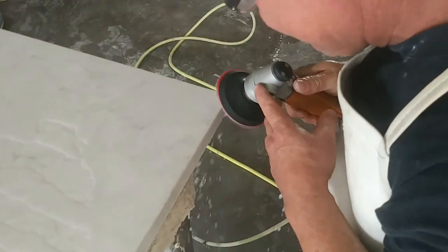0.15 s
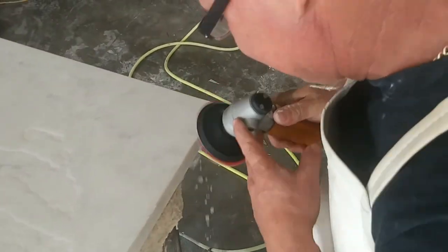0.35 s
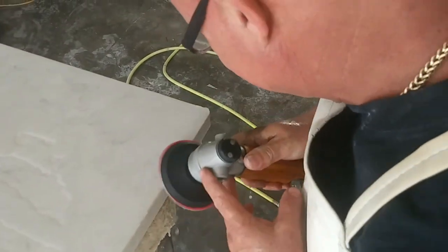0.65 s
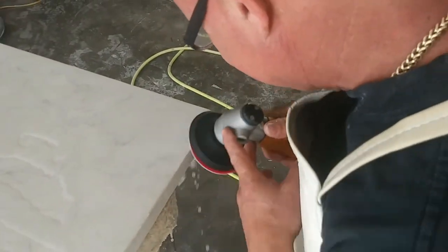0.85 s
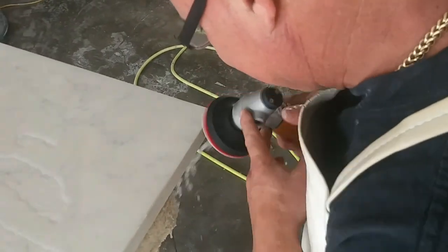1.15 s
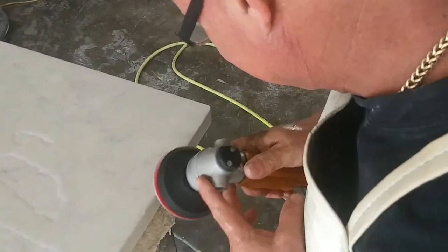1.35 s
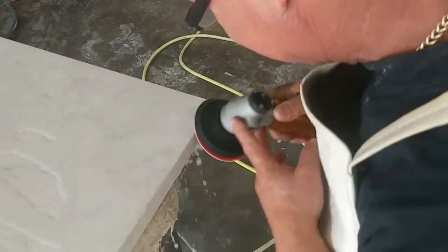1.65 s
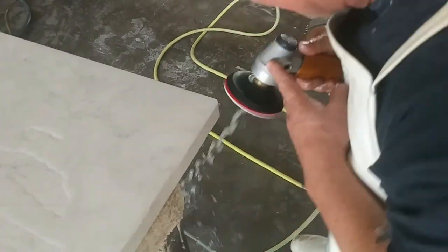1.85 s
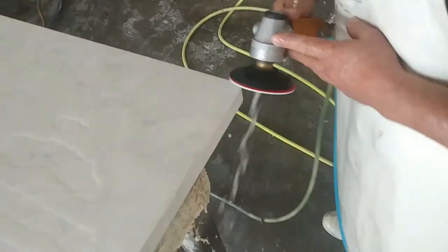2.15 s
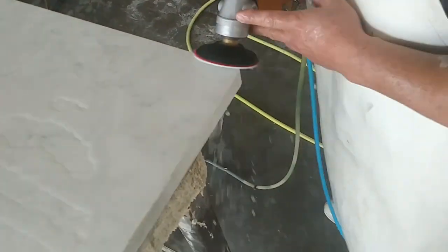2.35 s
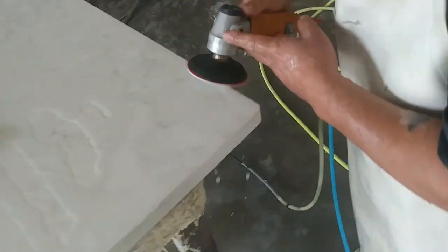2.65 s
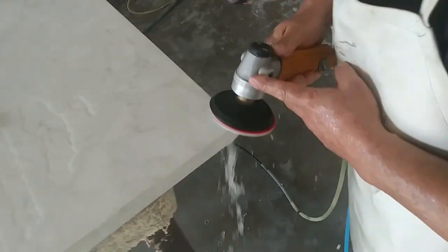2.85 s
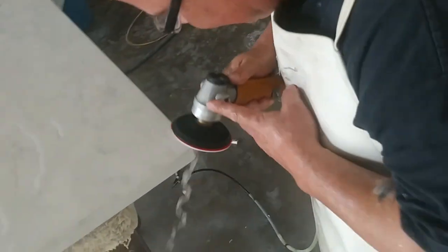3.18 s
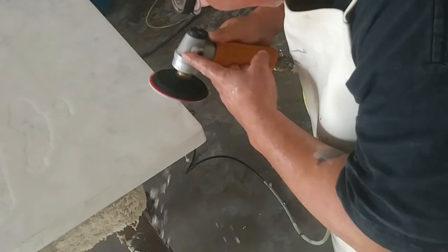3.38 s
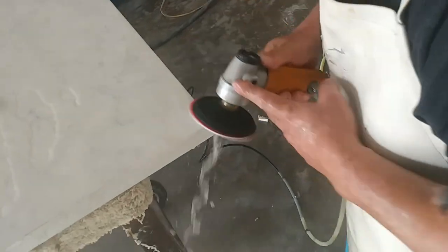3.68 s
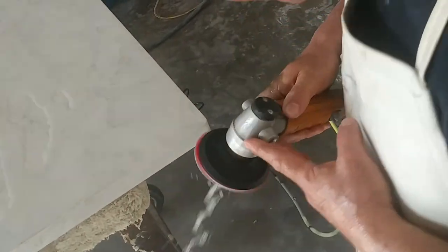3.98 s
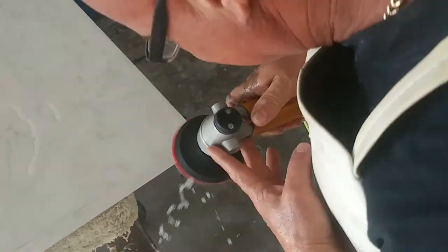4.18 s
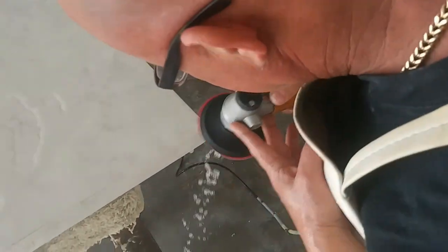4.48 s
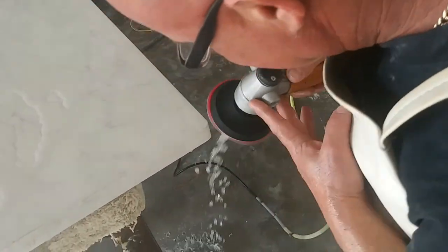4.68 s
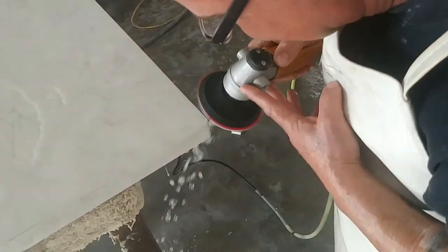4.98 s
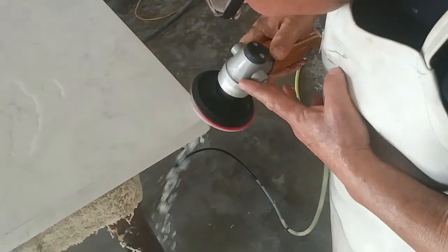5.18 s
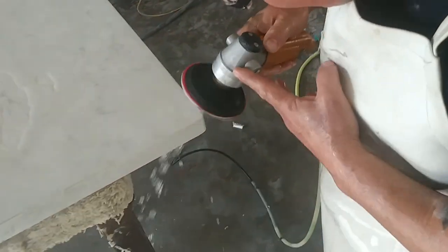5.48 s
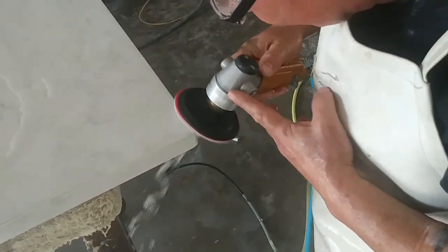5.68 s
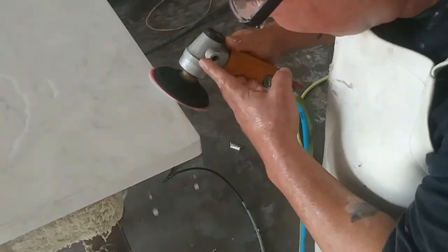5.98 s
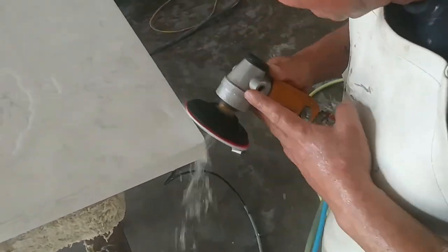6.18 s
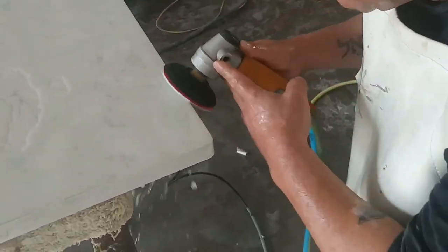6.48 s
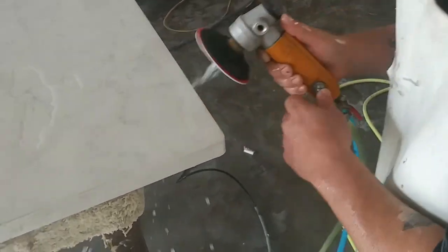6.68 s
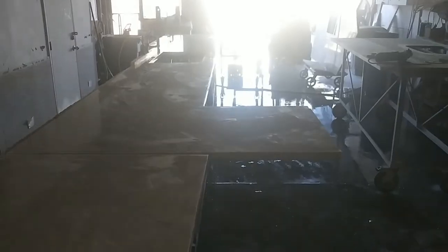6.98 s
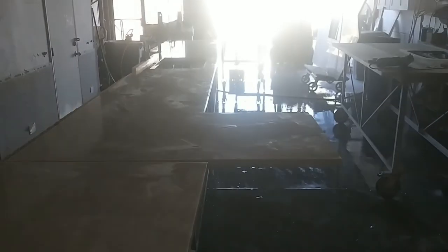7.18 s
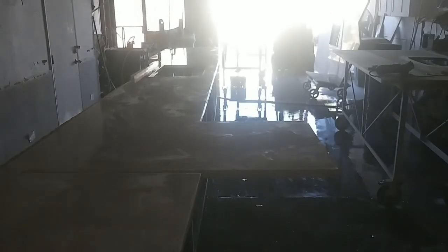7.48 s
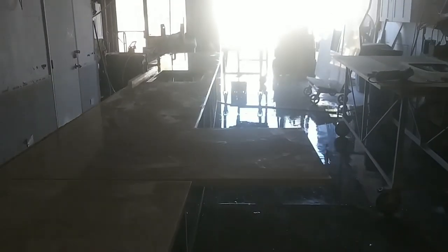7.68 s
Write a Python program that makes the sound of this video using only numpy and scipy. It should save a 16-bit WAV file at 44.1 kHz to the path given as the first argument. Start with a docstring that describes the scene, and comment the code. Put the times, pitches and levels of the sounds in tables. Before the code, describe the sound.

From 0 seconds, a loud air-driven polisher works wet stone close to the microphone. Its buzzy, many-toned whine repeatedly sags and recovers, dropping deepest near 1.1 seconds, while a thin shrill line rides above. Pulsing exhaust hiss, grainy pad rubbing, a low water rush and bright spray run throughout, in a hard room with short reflections. Around 2.3-2.9 the flat pad adds a singing, high hiss as the motor rises and then sags. It surges near 3.2, dips near 3.5, and climbs by 4.2, then stays mostly high with small wobbles. From about 6 to 6.7 a narrow hiss joins as the tool tips. At 6.77 everything stops dead. After a tenth of a second of silence, a far quieter shop hiss swells in, settling until about 7.8, with a very faint low hum around 7.4 and two tiny, nearly joined ticks at 7.26.

```python
"""In a stone workshop, an air-driven wet polisher works the edge of a slab, close by.
Its vane motor is a stack of gliding partials that whines and sags under load, with a thin shrill line above.
Exhaust, rubbing pad and water are coloured noises, mirrored by the slab; a limiter holds the peaks.
After an abrupt stop and a moment of silence comes the far hiss of the shop, with a hum and two ticks."""
import sys
import numpy as np
from scipy import signal
from scipy.fft import rfft, irfft, next_fast_len
from scipy.io import wavfile
from scipy.ndimage import uniform_filter1d, minimum_filter1d, map_coordinates

SR = 44100
rng = np.random.default_rng(int(sys.argv[2]) if len(sys.argv) > 2 else 0)


def wav_record(signal):
    """Record a signal, one row per channel, as 16-bit PCM in the file named by sys.argv[1]."""
    frames = np.transpose(np.atleast_2d(signal))
    bounded = np.clip(frames, -1, 1)
    # unit amplitude maps onto the largest positive 16-bit level
    quanta = np.round(bounded * 32767).astype(np.int16)
    wavfile.write(sys.argv[1], SR, quanta)


N = 345723
TIME = np.arange(N) / SR

# how strongly the housing radiates a partial, ahead of the swells: [f/Hz, level/dB]
HOUSING = [(550, -31), (900, -36), (1280, -30.5), (1520, -32.5), (1830, -32), (2100, -27.5), (2450, -19),
           (2900, -24), (3650, -21.5), (3950, -28.5), (4200, -38), (4600, -46), (5500, -33.5), (6300, -30),
           (7350, -30.5), (8200, -41.5), (8750, -34), (9250, -30), (10000, -50)]
# colour of the pad's rubbing, which also colours the ticks: [f/Hz, relative density/dB per Hz]
PAD_COLOUR = [(3900, -20), (4700, -9), (5400, -1), (6000, -1), (6800, -1.5), (7700, 1.5), (8500, -3),
              (9200, -8), (10000, -31), (11500, -32.5)]
# more or less water is flung towards the listener: [t/s, change of level/dB]
WATER_LEVEL = [(0, 0), (.3, -2), (.7, 2.5), (1.25, -2), (1.6, 1.2), (2.1, -1), (2.5, 0.5), (3.5, 1),
               (3.9, 2), (4.28, 3), (4.75, -1), (5.2, 0.5), (5.5, 2.1), (6.15, -1), (6.75, .5)]


def from_db(db):
    """Decibels to gain."""
    return 10 ** (np.asarray(db) / 20)


def rms_one(x):
    """Scale to rms 1."""
    return x / np.sqrt(np.mean(x ** 2) + 1e-20)


def in_time(points):
    """A curve of (time, value) points, sample by sample."""
    times_s, values = np.transpose(points)
    return np.interp(TIME, times_s, values)


def at_hz(points, hz):
    """Gain of a spectrum at given frequencies, read along a logarithmic pitch axis."""
    points_hz, db = np.transpose(points)
    return from_db(np.interp(np.log(hz), np.log(points_hz), db))


def noise(spectrum):
    """Noise of a given colour, falling steeply beyond its ends; rms 1."""
    size = next_fast_len(N)
    hz = np.maximum(np.arange(size // 2 + 1) * SR / size, 1)
    lowest_hz, highest_hz = spectrum[0][0], spectrum[-1][0]
    skirts = np.minimum(1, np.minimum(hz / lowest_hz, highest_hz / hz)) ** 6
    white = rfft(rng.standard_normal(size))
    coloured = irfft(white * at_hz(spectrum, hz) * skirts, size)
    return rms_one(coloured[:N])


def band(x, hz, width_hz):
    """A resonance with steep sides."""
    edges_hz = [hz - width_hz / 2, hz + width_hz / 2]
    sos = signal.butter(2, edges_hz, "band", fs=SR, output="sos")
    return signal.sosfilt(sos, x + 1e-18)


def drift(rate_hz):
    """Slow chance, spread 1: noise smoothed by two equal one-pole lowpasses."""
    step, settle = 40, 2000  # samples per slow point, slow points dropped at the start
    r = np.exp(-2 * np.pi * rate_hz * step / SR)
    white = rng.standard_normal(N // step + settle + 2)
    slow = signal.lfilter([1], [1, -2 * r, r * r], white)[settle:]
    return np.interp(np.arange(N) / step, np.arange(len(slow)), rms_one(slow))


def stream(source, db, flicker_db, grain_db):
    """Turbulent noise that flickers and breaks into fine grains."""
    grainy = rms_one(source * from_db(grain_db * drift(430)))
    return from_db(db + flicker_db * drift(17)) * grainy


def polisher():
    """Motor tones off floor and walls, plus exhaust, pad and water mirrored by the slab."""
    # motor speed at its turning points, sagging each time the pad is pressed on: [t/s, vane passes/Hz]
    turning_points = [(0, 822), (.18, 724), (.41, 871), (.61, 697), (.78, 814), (1.06, 530), (1.32, 864),
                      (1.45, 773), (1.58, 793), (1.82, 709), (1.97, 852), (2.33, 876), (2.59, 637),
                      (2.84, 673), (2.99, 645), (3.22, 877), (3.46, 584), (3.67, 700), (3.81, 628),
                      (3.99, 851), (4.17, 901), (4.5, 913), (4.64, 900), (4.92, 925), (5.08, 871),
                      (5.21, 923), (5.41, 932), (5.47, 863), (5.68, 931), (5.86, 845), (6.03, 812),
                      (6.21, 916), (6.37, 933), (6.48, 827), (6.6, 792), (6.75, 910)]
    # inertia rounds every turn of the speed
    steady = uniform_filter1d(in_time(turning_points), size=3300)
    pressed = contact(steady)
    speed, angle = rotor(steady, jitter=0.000998, shake=0.00179)

    # the whine is clearest when the pad lifts
    tones = from_db(-0.8 * pressed) * whine(speed, angle, fade_db=1.15, flutter_db=1.7, rasp_db=0.44, smear=0.089)
    tones = tones + from_db(-2 * pressed) * shrill(speed, angle, flutter_db=2.5, smear=0.5)
    tones = reflections(floor_echo(tones), t60=0.3, wet_db=-11)

    hisses = exhaust(angle) + wet_pad() + tipped_hiss() + flat_singing() + water(pressed)
    return tones + slab_echo(hisses, lag_ms=2.2, sway=0.2024, share=0.22)


def contact(speed):
    """How hard the pad bears on the stone, -1 lifted to 1 pressed: a slow or slowing rotor is a loaded one."""
    bite_hz, bite_width_hz, inertia_s = 848, 120, 0.19
    change_per_s = SR * uniform_filter1d(np.gradient(speed), size=4400)
    heading_hz = speed + inertia_s * change_per_s  # the speed that the rotor is heading for
    return np.tanh((bite_hz - heading_hz) / bite_width_hz)


def rotor(steady, jitter, shake):
    """Vane rate in Hz and vane angle in radians; the rubbing pad makes the speed waver."""
    speed = steady * (1 + jitter * drift(14.13) + shake * drift(149))
    return speed, 2 * np.pi * np.cumsum(speed) / SR


def whine(speed, angle, fade_db, flutter_db, rasp_db, smear):
    """Each vane lets out a puff of air: a stack of partials sweeping through the housing's resonances."""
    # level of the two lowest partials: [t/s, level/dB]
    body = [(0, 3.5), (.5, -1.5), (1.55, -2.5), (2.25, 2.5), (2.7, -2), (3.15, 2), (4.2, 0), (5.0, 3),
            (5.75, 2), (6.2, 0.5), (6.6, 4)]
    # level around the housing's lower resonance, as the tool is turned: [t/s, level/dB]
    low_ring = [(0, -1.5), (.38, -8.5), (.6, -0.5), (1.25, -6), (1.5, -1), (1.801, -6.5), (2.02, 3.5),
                (2.3, 0.5), (2.6, -10), (2.9, -5), (3.13, 3.5), (3.5, 1), (3.72, -0.5), (4.0, 5.5),
                (4.5, -8), (4.8, -1), (5.6, -2), (5.95, -17), (6.75, -4)]
    # level around its upper resonance: [t/s, level/dB]
    high_ring = [(0, -2.5), (.42, -6), (.68, 3), (1.25, -7.5), (1.58, 6.5), (1.8, -2), (2.1, 6),
                 (2.45, 2.5), (3.13, 3.5), (3.4, -3), (3.9, 1.5), (4.25, 8), (4.6, 2), (5.0, -6.5),
                 (5.55, -12.5), (5.85, 3), (6.25, 5), (6.6, -5.5)]
    # level of the whine's treble: [t/s, level/dB]
    overtones = [(0, 2), (1.1, -8), (1.4, 0.5), (1.8, -1), (2.25, 4), (2.6, 3), (3.1, 0), (3.9, -6),
                 (4.15, -4), (4.45, 1.5), (5.7, 5.5), (6.0, -1), (6.3, -0.5), (6.75, 1.5)]
    levels_db = [in_time(curve) for curve in (body, low_ring, high_ring, overtones)]

    fading = fade_db * drift(7.4)  # the lowest partials fade in and out most
    out = 0
    for order in range(1, 10):
        # uneven puffs leave the low orders clean and break up the high ones
        unrest_db = fading / order + flutter_db * drift(23) + order * rasp_db * drift(90)
        gain = radiation(order * speed, levels_db) * rms_one(from_db(unrest_db))
        phase = order * (angle + smear * drift(77)) + rng.uniform(0, 2 * np.pi)
        out = out + np.sqrt(2) * gain * np.sin(phase)
    return out


def radiation(hz, levels_db):
    """Gain of a partial at its momentary pitch: the housing's colour and the level of the region it crosses."""
    # from the body to the lower resonance, the upper one and the treble
    crossover_hz, crossover_width_hz = [2050, 2940, 4600], 300
    db = levels_db[0]
    for edge_hz, below, above in zip(crossover_hz, levels_db, levels_db[1:]):
        passed = np.clip(0.5 + (hz - edge_hz) / crossover_width_hz, 0, 1)
        db = db + (above - below) * passed
    return at_hz(HOUSING, hz) * from_db(db)


def shrill(speed, angle, flutter_db, smear):
    """A thin, steadier line locked to the rotor, probably the gears, which sings out near full speed."""
    order = 10  # cycles per vane pass
    gain = at_hz(HOUSING, order * speed) * from_db(1.5 + flutter_db * drift(18))
    return np.sqrt(2) * gain * np.sin(order * angle + smear * drift(77))


def floor_echo(x):
    """One dull echo from the floor: the low whine fades in and out against it as the pitch glides."""
    lag_s, share = 0.00698, 0.4
    dull = uniform_filter1d(x, size=16)
    return x + share * np.interp(TIME - lag_s, TIME, dull)


def reflections(x, t60, wet_db):
    """Slab, floor and walls return a dense tail, against which gliding tones beat."""
    t = TIME[:SR // 2]
    decay = from_db(-60 * t / t60)
    tail = rng.standard_normal(len(t)) * decay * (t > 0.004)  # the first 4 ms stay empty
    wet = signal.fftconvolve(x, tail / np.linalg.norm(tail))[:N]
    return x + from_db(wet_db) * wet


def exhaust(angle):
    """Hissing air that leaves in time with the vanes, its resonances sliding with the outlet."""
    # colour of the hiss: [f/Hz, relative density/dB per Hz]
    colour = [(1400, -27.5), (2000, -10.5), (2400, -2), (2650, -2.5), (3000, 0), (3350, 1.5), (3750, -2),
              (4100, -7), (4500, -16), (5300, -29.5)]
    # it swells as the outlet turns towards the listener: [t/s, level/dB]
    swell = [(0, -14.5), (.52, -16), (.7, -12), (1.05, -15.5), (1.33, -16.5), (1.56, -10.5), (1.83, -15.3),
             (2.1, -16), (2.5, -17.5), (2.92, -17), (3.15, -11.5), (3.45, -16), (3.73, -16), (3.9, -9.5),
             (4.12, -14), (4.37, -12), (4.75, -15.3), (5.7, -13.5), (6.0, -13), (6.75, -15.5)]
    # resonances shift as the outlet turns against hand and apron: [t/s, shift/semitones]
    outlet = [(0, 0.011), (.7, 0.59), (1.2, -0.11), (1.55, 0.75), (2.0, -0.51), (2.7, 0.33), (3.2, -0.71),
              (3.6, -0.09), (3.95, -1.03), (4.3, .35), (4.9, -0.81), (5.5, -0.83), (6.3, 1.1)]
    puffs = rms_one(1 + 0.24 * np.cos(angle))
    hiss = shifted(noise(colour), in_time(outlet))
    return puffs * stream(hiss, in_time(swell), flicker_db=0.5, grain_db=1.0)


def shifted(x, semitones):
    """Slide all resonances of a noise up or down together by reading it faster or slower."""
    place = np.cumsum(2 ** (semitones / 12)) % (N - 1)
    return map_coordinates(x, [place], order=3)


def wet_pad():
    """The wet pad rubs the stone: a flickering, grainy hiss."""
    # level of the pad's hiss: [t/s, level/dB]
    rub_level = [(0, -16.5), (.35, -17.5), (1.3, -18.5), (1.55, -18), (2.1, -19), (2.55, -16.5), (2.9, -15),
                 (3.17, -19.5), (3.65, -17.2), (3.92, -19), (4.33, -19.5), (4.6, -17.5), (5.1, -17),
                 (5.65, -17.5), (6.25, -21.5), (6.57, -18), (6.75, -22)]
    return stream(noise(PAD_COLOUR), in_time(rub_level), flicker_db=0.75, grain_db=1.3)


def tipped_hiss():
    """A narrow band of noise joins when the tool is tipped on its side."""
    # level of the narrow hiss: [t/s, level/dB]
    tipped_level = [(5.8, -50), (6.0, -27), (6.3, -21.5), (6.6, -24), (6.77, -38)]
    hiss = rms_one(band(rng.standard_normal(N), hz=4187, width_hz=430))
    return from_db(in_time(tipped_level)) * hiss


def flat_singing():
    """The pad sings, as a band of noise, when it lies flat on the slab."""
    # level of the singing: [t/s, level/dB]
    flat_level = [(2.1, -53), (2.35, -19.5), (2.65, -20), (2.9, -24), (3.1, -51)]
    singing = rms_one(band(rng.standard_normal(N), hz=5680, width_hz=1170))
    return from_db(in_time(flat_level)) * singing


def water(pressed):
    """Water flung off as the pad bears down: a low rush and a high spray, both louder under pressure."""
    # colour of the rush: [f/Hz, relative density/dB per Hz]
    rush_colour = [(25, -22), (90, -21.5), (160, -10), (260, -4.5), (500, -4.5), (800, -1), (1050, -1.5),
                   (1500, -1), (1900, 1), (2600, -11)]
    # colour of the spray: [f/Hz, relative density/dB per Hz]
    spray_colour = [(8300, -22), (9300, 2), (9800, 1.5), (10500, -4), (11200, -10), (12200, -13.5),
                    (13400, -19), (15500, -19)]
    flung_db = in_time(WATER_LEVEL)
    # level at half contact, and the swing either way
    rush_db = -25.5 + flung_db + 1 * pressed
    spray_db = -26 + flung_db + 2.5 * pressed
    rush = stream(noise(rush_colour), rush_db, flicker_db=0.83, grain_db=0.5)
    spray = stream(noise(spray_colour), spray_db, flicker_db=0.6, grain_db=0.5)
    return rush + spray


def slab_echo(x, lag_ms, sway, share):
    """The slab mirrors the hiss; the tool moves, so the comb of notches wanders."""
    lag = lag_ms * SR / 1000 * np.exp(sway * drift(0.8))  # in samples
    echo = map_coordinates(x, [np.arange(N) - lag], order=3)
    return (x + share * echo) / np.hypot(1, share)


def shop():
    """The far shop: air and water hiss, a hum and two small ticks."""
    return shop_hiss() + shop_hum(hum_hz=133) + ticks()


def shop_hiss():
    """Far air and water: coloured noise that swells in and settles."""
    # level of the hiss, ahead of a 2 dB cut: [t/s, level/dB]
    far_level = [(6.87, -46), (6.91, -41), (6.95, -39.5), (7.03, -36), (7.08, -34), (7.14, -36),
                 (7.3, -35.5), (7.55, -36), (7.84, -36.5)]
    # its colour: [f/Hz, relative density/dB per Hz]
    far_colour = [(40, -32), (70, -15), (160, -8), (230, -4.5), (520, -8), (900, 2.5), (1500, -9),
                  (2200, -6), (2900, -5.5), (3900, 1.5), (5100, -7), (5700, -12), (6300, -7), (7800, -4.5),
                  (10000, -14.5), (13000, -33)]
    return from_db(in_time(far_level) - 2.0) * noise(far_colour)


def shop_hum(hum_hz):
    """A low sine of wavering pitch that swells and fades."""
    # level of the hum: [t/s, level/dB]
    hum_level = [(6.87, -78), (7.1, -64), (7.25, -58), (7.5, -57), (7.65, -63), (7.84, -68)]
    wavering_hz = hum_hz * (1 + 0.008 * drift(6.7))
    phase = 2 * np.pi * np.cumsum(wavering_hz) / SR
    return from_db(in_time(hum_level)) * np.sqrt(2) * np.sin(phase)


def ticks():
    """Two short taps: bursts of noise dying within a few milliseconds."""
    # onset and strength of each tap, ahead of the band filter: [t/s, level/dB]
    taps = [(7.260, -26), (7.269, -30)]
    decay_s = 0.0009
    strokes = sum(from_db(db) * (TIME >= s) * np.exp(-abs(TIME - s) / decay_s) for s, db in taps)
    return band(strokes * noise(PAD_COLOUR), hz=6000, width_hz=5500)


def scene():
    """The close work stops dead; after a short silence the far shop follows. Both channels are alike."""
    stop_s, shop_start_s = 6.768, 6.871
    close = polisher() * np.clip((stop_s - TIME) / 0.003, 0, 1)  # a 3 ms fade
    mono = close + shop() * (TIME > shop_start_s)
    return np.array([mono, mono])


def limiter(x, drive_db, ceiling):
    """A very fast limiter turns the gain down around each peak."""
    x = x * from_db(drive_db)
    gain = np.minimum(1, ceiling / (np.abs(x).max(axis=0) + 1e-9))
    return x * uniform_filter1d(minimum_filter1d(gain, size=25), size=25)


def record(dry):
    """Peaks are held down, then a steep lowpass cuts the top."""
    held = limiter(dry, drive_db=0.43, ceiling=0.76)
    cutoff_hz = 15500
    sos = signal.ellip(12, 0.1, 80, cutoff_hz, fs=SR, output="sos")
    return signal.sosfilt(sos, held)


dry = scene()
out = record(dry)
wav_record(out)
```